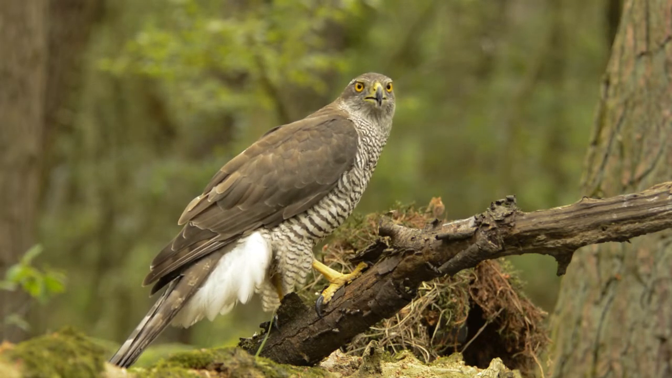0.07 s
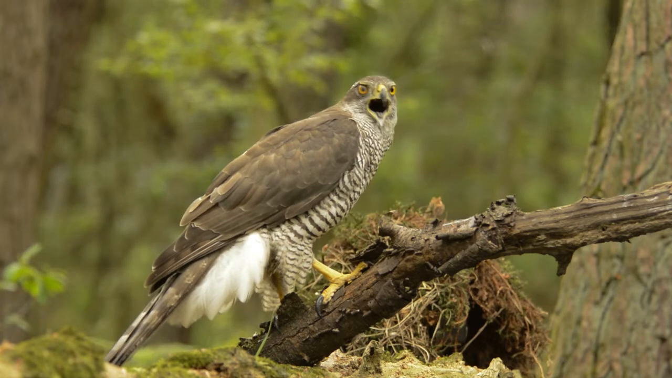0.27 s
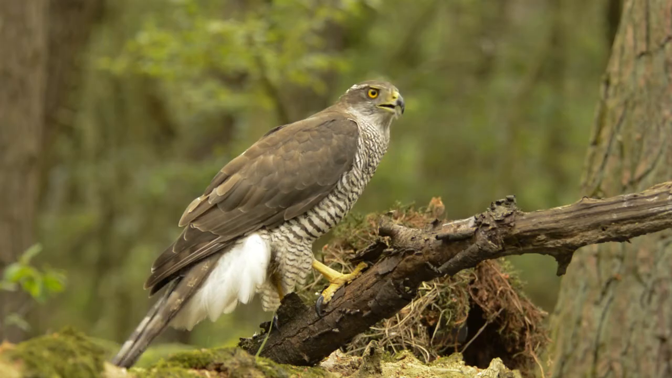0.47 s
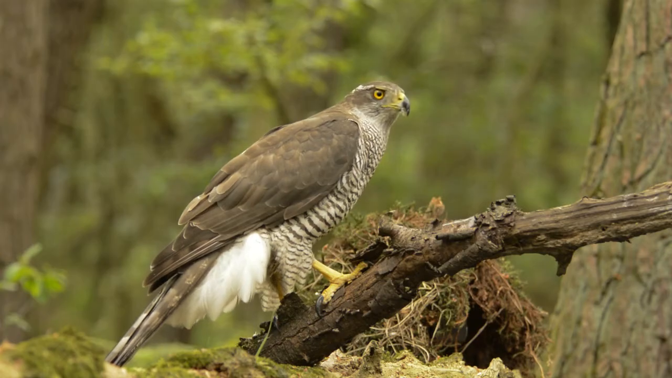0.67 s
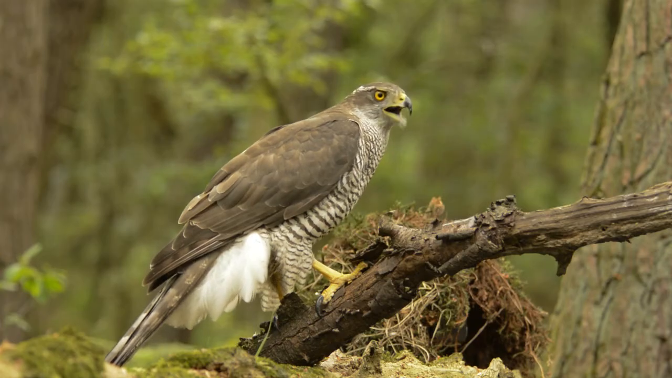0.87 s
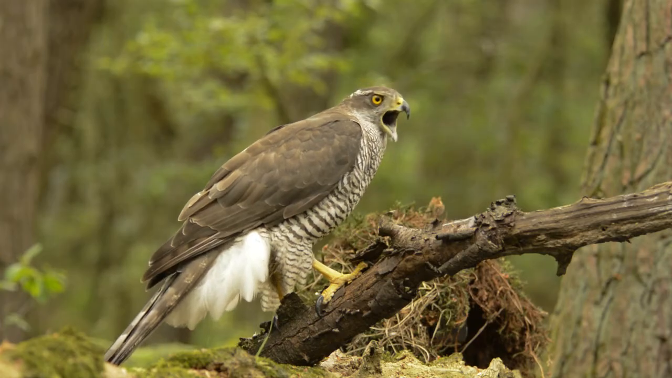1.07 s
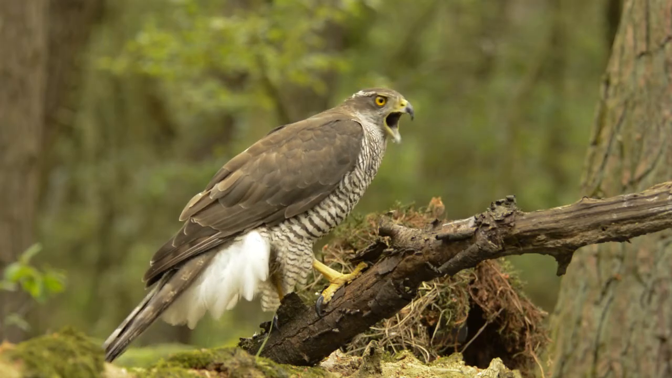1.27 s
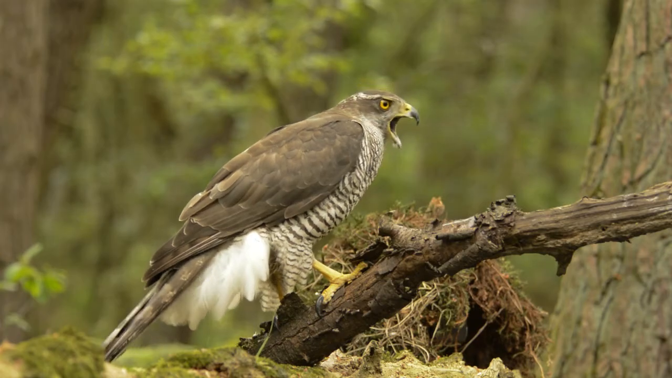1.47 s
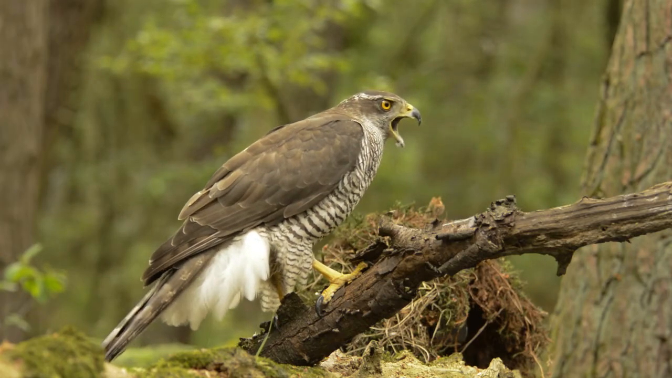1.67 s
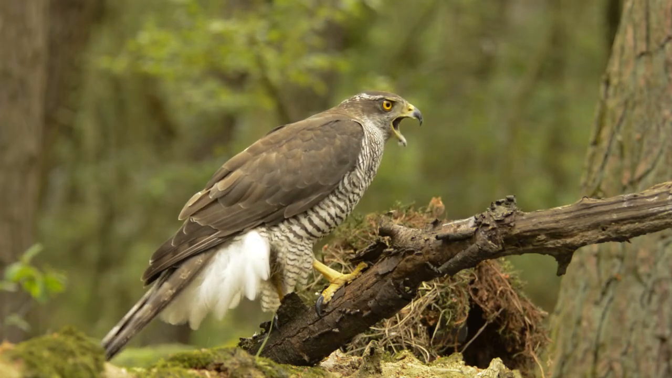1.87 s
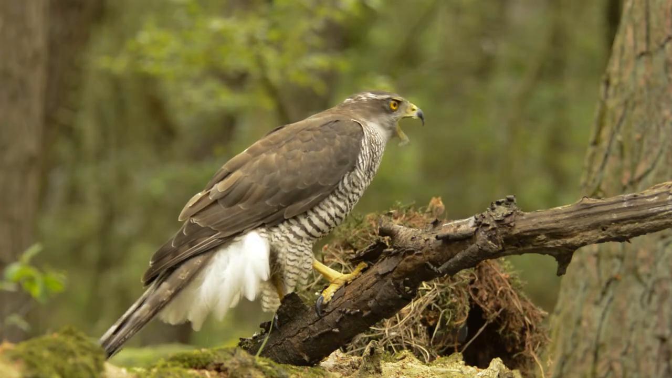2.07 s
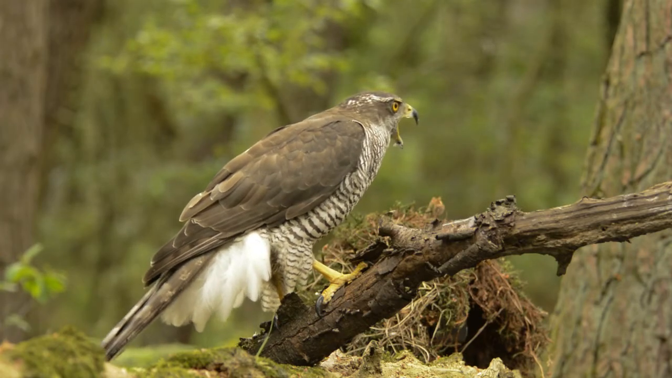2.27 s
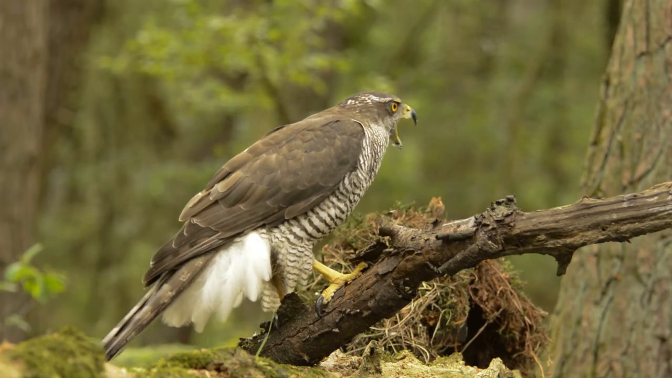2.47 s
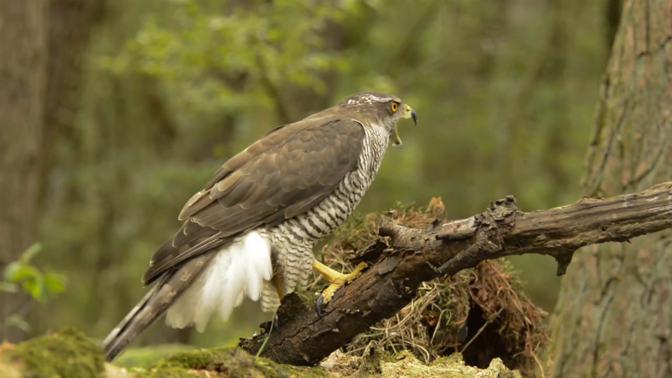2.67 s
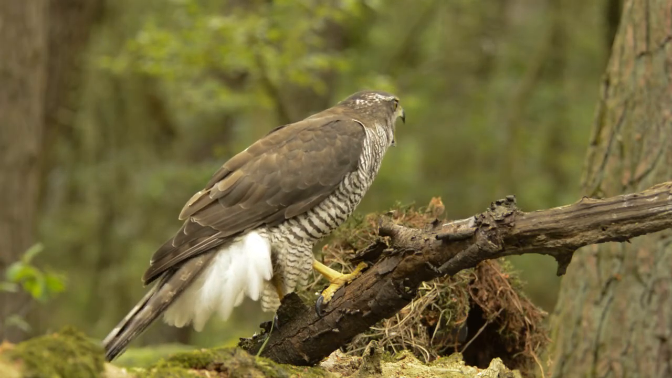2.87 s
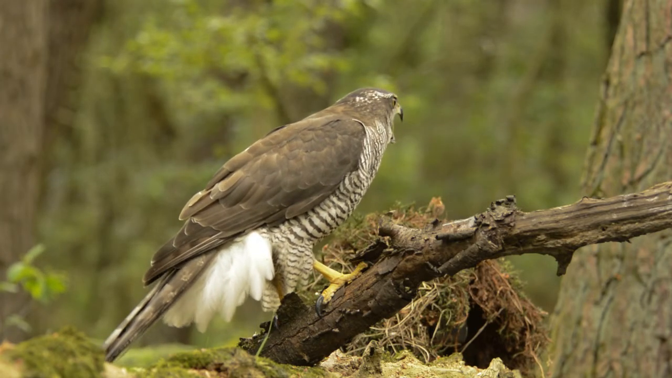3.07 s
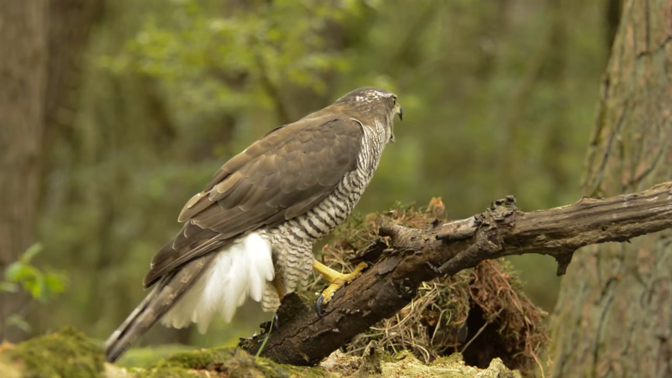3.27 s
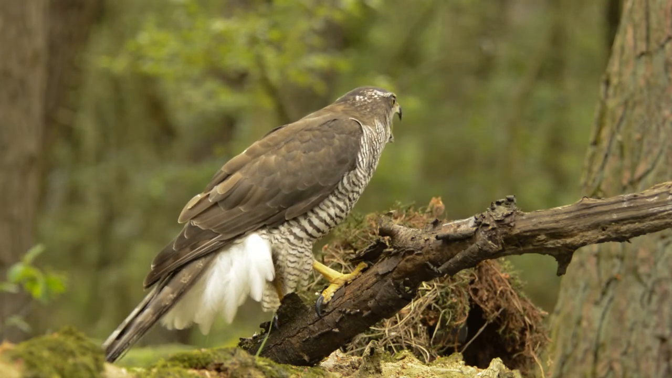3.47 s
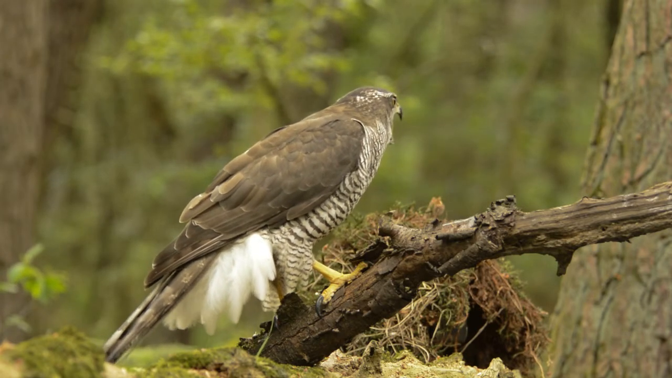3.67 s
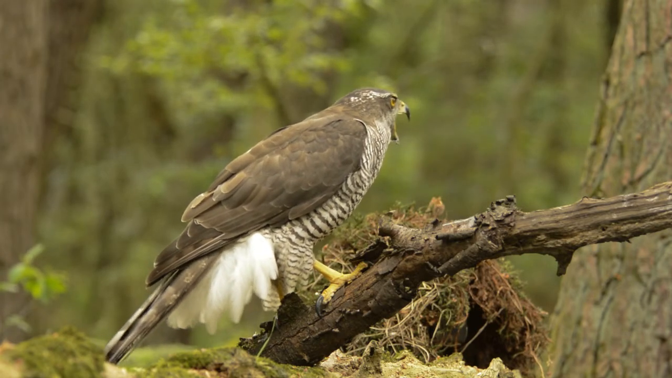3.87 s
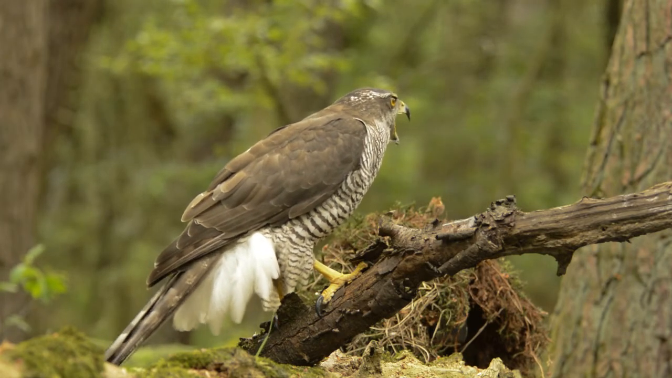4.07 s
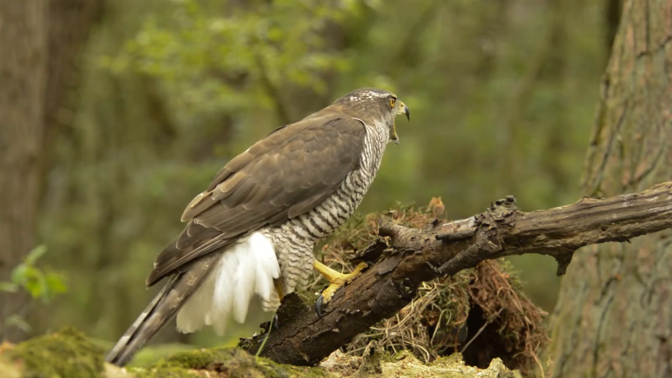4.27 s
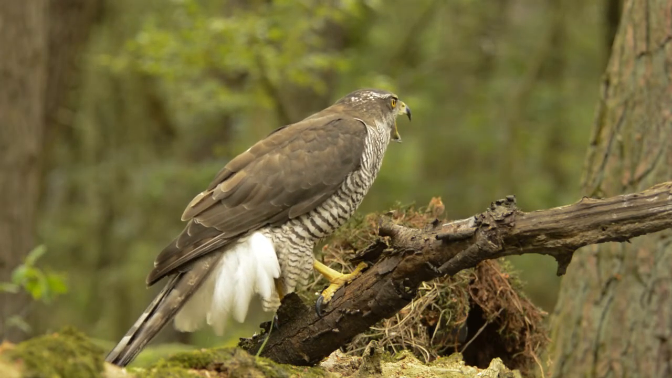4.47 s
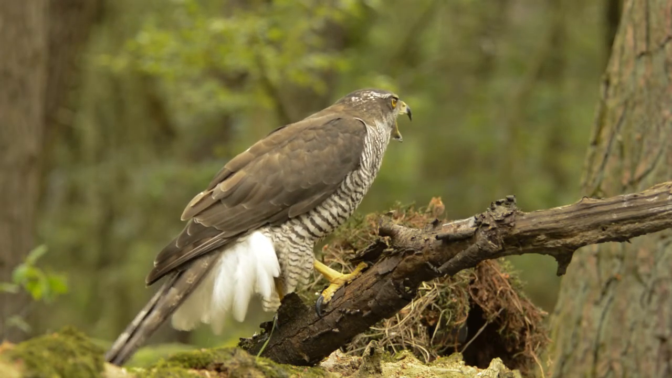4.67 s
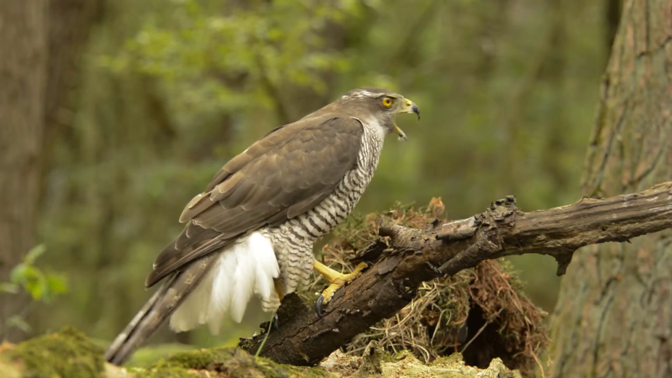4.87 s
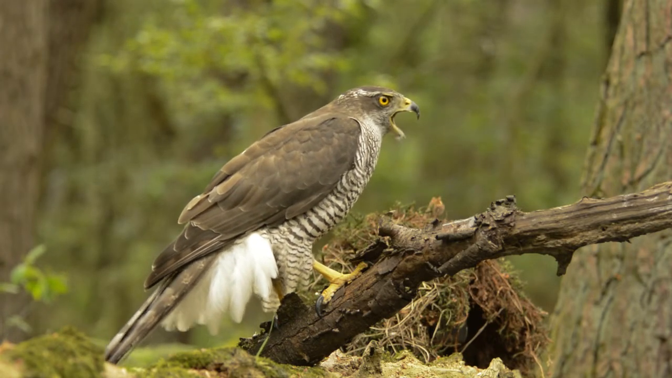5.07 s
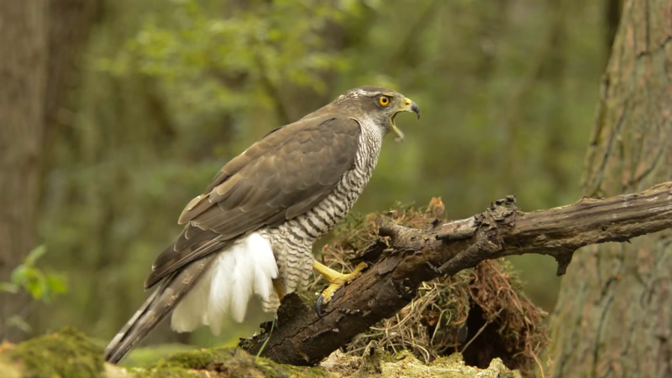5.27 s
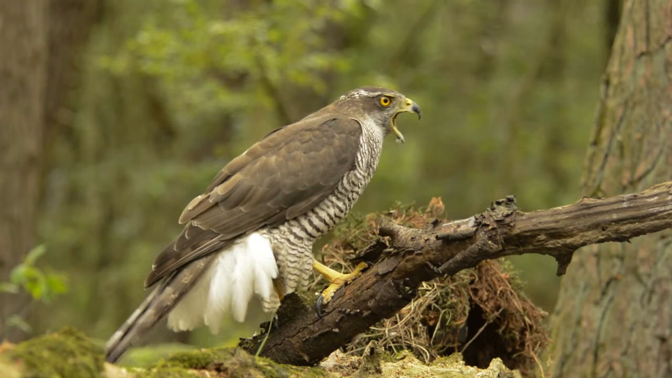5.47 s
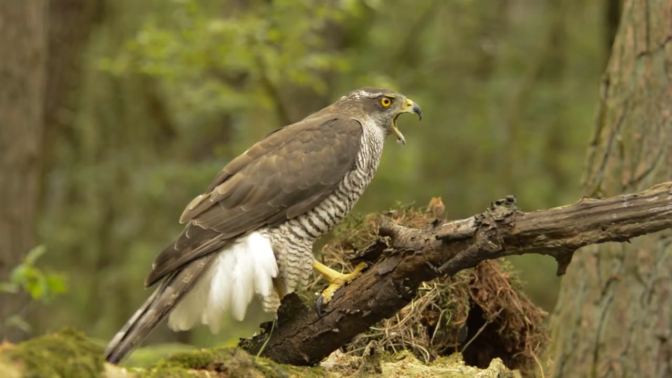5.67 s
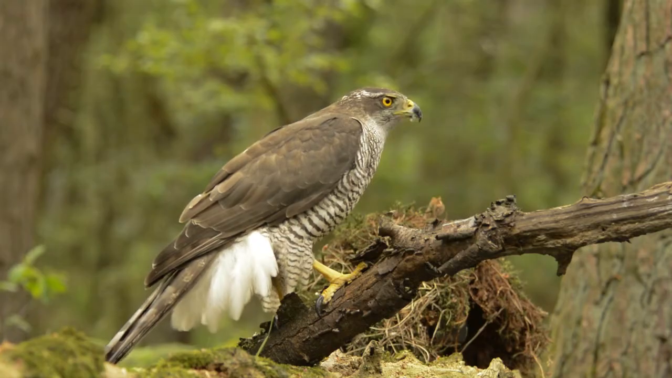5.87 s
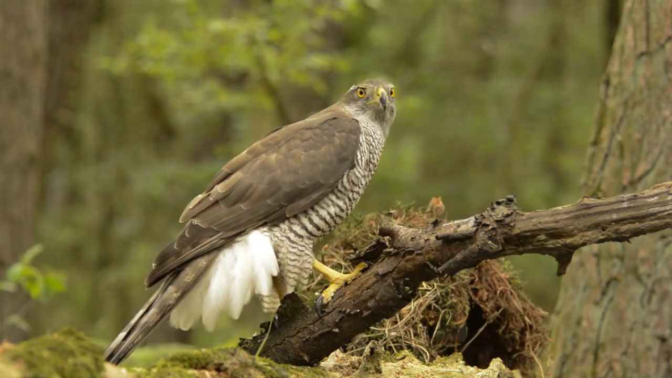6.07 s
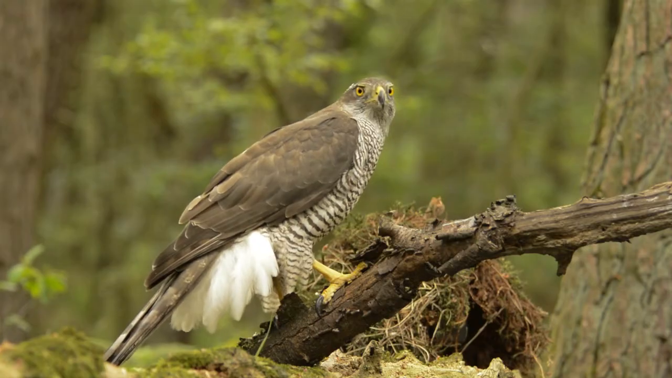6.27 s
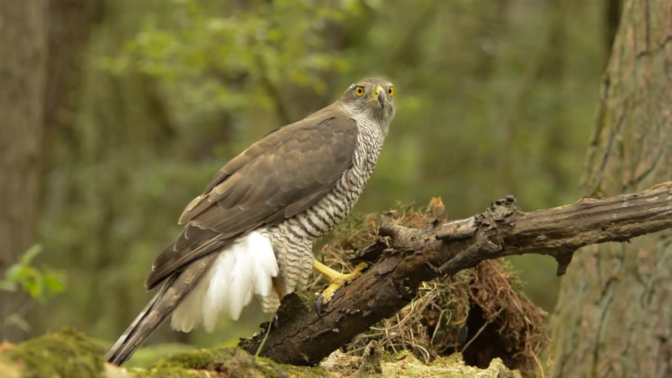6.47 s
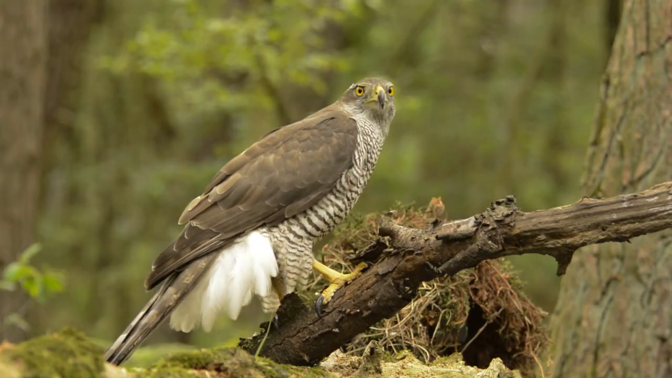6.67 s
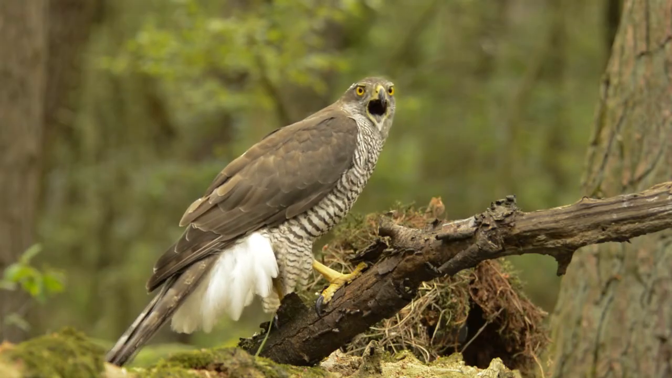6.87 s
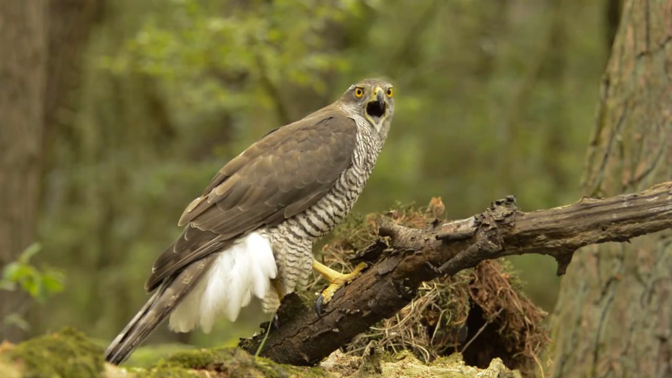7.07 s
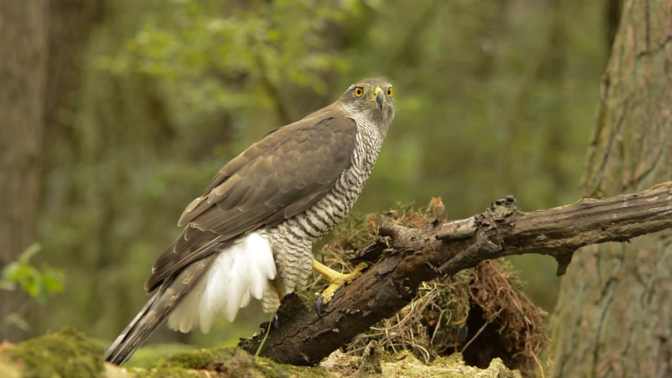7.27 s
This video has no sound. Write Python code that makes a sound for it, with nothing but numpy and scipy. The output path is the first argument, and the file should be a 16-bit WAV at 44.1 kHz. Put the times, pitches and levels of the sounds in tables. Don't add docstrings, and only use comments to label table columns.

```python
import sys
import numpy as np
from scipy import signal
from scipy.fft import rfft, irfft, next_fast_len
from scipy.io import wavfile

SR = 44100
rng = np.random.default_rng(int(sys.argv[2]) if len(sys.argv) > 2 else 0)


def rack_gain(trim_db):
    fader = np.asarray(trim_db, float)
    return 10 ** (fader / 20)


def generate_wav(signal):
    frames = np.transpose(np.atleast_2d(signal))
    scaled = np.clip(frames, -1, 1) * 32767
    pcm = np.round(scaled).astype(np.int16)
    wavfile.write(sys.argv[1], SR, pcm)


N = 323253

# frequency in Hz, level in dB per Hz.
AIR_SPECTRUM = [(15, -29), (35, -10.5), (62, -24), (90, -10), (128, -4.5), (200, -19), (290, -9.5),
                (500, -14), (655, -4), (900, -14.5), (1550, -11), (2900, -15), (7600, -18), (15800, -22.5)]
# frequency in Hz, likeness from 0 to 1.
MICROPHONE_LIKENESS = [(60, 0.99), (180, 0.9), (550, 0.6), (1650, 0.15), (4970, 0.11), (15000, 0.01)]
# start in seconds, level in dB.
RISING_CHIRPS = [(-.012, -61.5), (.951, -56.5), (2.165, -56.5), (3.857, -56), (6.328, -57), (6.477, -57)]
# start in seconds, level in dB.
FALLING_CHIRPS = [(.057, -59), (1.024, -56), (1.84, -59), (2.725, -57.5), (6.547, -61.5)]
# start in seconds, level in dB.
CLOSING_CHIRPS = [(1.108, -57.5), (2.3, -54), (4.03, -62)]
# start in seconds, length in seconds, first pitch in Hz,
# last pitch in Hz, level in dB.
TICKS = [
    (1.003, 0.0065, 9830, 6070, -55),
    (1.163, 0.0068, 9330, 7860, -54),
    (3.985, 0.0081, 9200, 6250, -54),
    (4.268, 0.0059, 8360, 6300, -54),
]
# start in seconds, length in seconds, first pitch in Hz,
# last pitch in Hz, level in dB.
THIN_WHISTLES = [
    (1.175, .44, 9040, 7696, -51),
    (6.198, .465, 9120, 7724, -50),
]
# frequency in Hz, gain in dB.
THROAT = [(400, -37), (900, -26), (1600, -14), (2050, -12), (2400, -10), (2670, 1.5), (2950, -3.5),
          (3500, -4), (4300, -11), (5200, -20), (6500, -25.5), (8000, -21.5), (11000, -33.5), (16000, -38)]
# time in seconds, pitch in Hz, level in dB, beak opening in dB.
LEAD_IN = [
    (0.156, 895, -64, -30),
    (0.171, 1022, -19.5, -58),
    (.188, 1110, -44, -40),
]
# time in seconds, pitch in Hz, level in dB, beak opening in dB.
WAIL = [
    (0.189, 1120, -43, -39),
    (0.202, 1363, -37.5, -26),
    (.221, 1446, -24.5, -3),
    (.276, 1566, -25, 5.5),
    (.332, 1604, -35.5, 15.5),
    (.381, 1559, -21.5, 3.5),
    (0.414, 1480, -25.5, -11),
    (.441, 1366, -34.5, -32),
    (0.467, 1130, -35.5, -41),
]
# time in seconds, pitch in Hz, level in dB, beak opening in dB.
SOFT_NOTE = [
    (1.238, 957, -54, -24),
    (1.251, 1082, -24, -52),
    (1.264, 986, -21, -15.5),
    (1.281, 954, -24.5, -17.5),
    (1.296, 877, -30, -2.5),
    (1.319, 792, -42.5, -13),
]
# start in seconds, peak in dB, top pitch in Hz, length in seconds,
# beak opening in dB.
SHORT_NOTES = [(1.519, -18.5, 1236, 0.032, -0.5), (1.8, -17.5, 1241, 0.034, 0.5),
               (2.055, -17.5, 1250, 0.033, -0.2), (2.299, -20.5, 1280, 0.035, 1.5),
               (2.534, -20.5, 1277, 0.034, 1.7), (2.769, -20.5, 1280, 0.034, 1.5),
               (2.993, -24.5, 1283, 0.037, 4.5), (3.219, -24, 1269, 0.038, 4),
               (3.453, -24.5, 1288, 0.041, 5), (3.683, -25.5, 1304, .045, 8.5),
               (3.907, -22.5, 1311, .042, 6), (4.135, -23, 1324, 0.046, 7), (4.371, -23, 1337, 0.045, 7.5),
               (4.6, -23.5, 1328, 0.043, 8.5), (4.827, -20.5, 1340, 0.042, 6), (5.047, -19, 1350, 0.045, 7),
               (5.262, -19, 1347, 0.044, 7), (5.48, -18.5, 1356, 0.045, 6.5),
               (5.699, -18.5, 1356, 0.045, 6), (6.899, -18, 1188, .029, -1), (7.151, -15.5, 1265, 0.032, 2)]
# share of its length, multiple of the pitch loss, level in dB,
# unevenness of every third cycle in dB, beak opening in dB.
SHORT_NOTE_COURSE = [
    (-.35, 2.2, -48, -14.5, -23.5),
    (-.08, .9, -19.5, -10, -42),
    (0.042, .1, -16.5, 1.5, -2),
    (.3, 0, -3, -16, -1),
    (0.599, .3, 2, -32, -0.5),
    (0.948, 1.0, -1.5, -27, -8),
    (1.098, 1.7, -4.5, -9, -23),
    (1.3, 2.4, -6.5, -19.5, -53),
]
# time in seconds, share turned from 0 to 1.
HEAD_TURN = [(0, 0.26), (1.1, 0.063), (1.9, .3), (2.6, 0.67), (4.6, 0.89), (5.1, 0.48), (5.9, 0.42),
             (6.9, 0.19), (7.2, 0.14)]
# delay in milliseconds, gain in both ears,
# left-right difference.
NEAR_ECHOES = [(4.875, 0.049, -0.38), (6.419, -0.45, -0.028), (9.16, .32, -0.035), (11.607, 0.24, -0.076),
               (14.05, 0.2, 0.08), (17.73, 0.33, 0.14), (24.3, -0.074, -0.017), (30.84, -0.11, -0.15)]
# centre in Hz, width in Hz, level in dB.
WING_HOLLOWS = [
    (287, 43, -15),
    (646, 52, -5.5),
    (1260, 240, 6),
    (1480, 42, -5),
    (1720, 74, -4),
]


def in_time(rows, t):
    s, *columns = np.transpose(rows)
    return [np.interp(t, s, column) for column in columns]


def at_hz(points, hz):
    point_hz, value = np.transpose(points)
    return np.interp(np.log(hz), np.log(point_hz), value)


def rms_one(x):
    return x / np.sqrt(np.mean(x ** 2) + 1e-20)


def band(x, low_hz, high_hz):
    edges_hz = [low_hz, min(high_hz, .45 * SR)]
    return signal.sosfilt(signal.butter(2, edges_hz, "band", fs=SR, output="sos"), x)


def wobble(size, rate):
    knots = rng.standard_normal(int(size * 400 / SR) + 3)
    return np.interp(np.arange(size) * min(rate, 400) / SR, np.arange(len(knots)), knots)


def two_ears(mid, side, alike):
    return np.sqrt(1 + alike) * mid + np.sqrt(1 - alike) * side * [[1], [-1]]


def add(track, start_s, sound):
    i = round(start_s * SR)
    track[i:i + len(sound)] += sound[:N - i]


def convolve(x, response):
    size = next_fast_len(N + response.shape[1])
    return irfft(rfft(x, size) * rfft(response, size), size)[:, :N]


def scatter(t60, start_s, alike, high_hz):
    t = np.arange(int(1.2 * SR)) / SR
    mid, side = rng.standard_normal((2, len(t)))
    side = band(band(side, 2200, 18000), 1800, 19000)
    noise = two_ears(mid, side, np.clip(alike, 0, 1))
    dull = band(noise, 1180, high_hz)
    swell = np.clip(t / start_s, 0, 1) ** 2
    response = swell * (dull * rack_gain(-60 * t / t60) + 0.5 * noise * rack_gain(-130 * t / t60))
    return rms_one(response) / np.sqrt(len(t))


def air():
    out = 0
    edges_hz = 22 * 2 ** np.arange(0, 9.6, .5)
    white = rng.standard_normal((2, 2, N))
    for k, (low_hz, high_hz) in enumerate(zip(edges_hz, edges_hz[1:])):
        centre_hz = np.sqrt(low_hz * high_hz)
        mid, side = band(white[k % 2], low_hz, high_hz)
        alike = np.clip(at_hz(MICROPHONE_LIKENESS, centre_hz), 0, 1)
        gain = rack_gain(at_hz(AIR_SPECTRUM, centre_hz) + .4 * wobble(N, 3))
        out = out + gain * two_ears(mid, side, alike)
    level_db = -58
    return rack_gain(level_db) * rms_one(out) * rack_gain(np.array([[.3], [-.3]]))


def far_rumble():
    level_db, loss_db, throb_db = -62.5, 7, 4.5
    ends_s, fade_s = 1.5, .8
    t = np.arange(N) / SR
    fade = np.clip((t - ends_s) / fade_s, 0, 1)
    rumble_db = level_db - loss_db * fade + throb_db * wobble(N, 3.5)
    deep = band(band(rng.standard_normal(N), 103, 160), 68, 217)
    return rms_one(deep) * rack_gain(rumble_db - 6.5)


def passing_drone():
    loudest_s, span_s = 3.56, 0.97
    level_db, fade_db, approach_db = -58, 10, -64
    rush_low_db = -50
    t = np.arange(N) / SR
    gain = rack_gain(level_db - fade_db * ((t - loudest_s) / span_s) ** 2)
    gain = gain + rack_gain(approach_db) * (t < loudest_s) * (1 - t / loudest_s)
    gain = gain + rack_gain(rush_low_db - 68 * (t[-1] - t))
    mid, side = rng.standard_normal((2, N))
    noise = band(mid + 0.18 * side * [[1], [-1]], 258, 820)
    return rms_one(noise) * gain * rack_gain(-6.5)


def whistle(pitch_hz, level_db, overtone_db):
    phase = 2 * np.pi * np.cumsum(pitch_hz) / SR
    octave = rack_gain(overtone_db) * (pitch_hz < 7950) * np.sin(2 * phase)
    return np.sqrt(2) * rack_gain(level_db) * (np.sin(phase) + octave)


def chirps(rows, hold):
    out = np.zeros(N)
    for s, length, first_hz, last_hz, level_db in rows:
        share = np.arange(0, 1, 1 / SR / length)
        bend = hold if last_hz < first_hz else .7
        glide_hz = first_hz + (last_hz - first_hz) * share ** bend
        swell = np.sqrt(np.sin(np.pi * share))
        add(out, s, swell * whistle(glide_hz, level_db + 5, overtone_db=-39))
    return out


def songbird():
    rise, fall, close = (0.03, 3830, 4340), (0.046, 5060, 3300), (0.019, 4350, 3850)
    low_first_hz, low_last_hz, low_db = 2470, 2220, -9.5
    rows = []
    for table, glide in (RISING_CHIRPS, rise), (FALLING_CHIRPS, fall), (CLOSING_CHIRPS, close):
        rows += [(max(s, 0), *glide, db) for s, db in table]
    rows += [(s, fall[0], low_first_hz, low_last_hz, db + low_db) for s, db in FALLING_CHIRPS]
    return chirps(rows, hold=2.4)


def thin_whistles():
    settle_s, attack_s, release_s = .075, .045, 0.057
    out = np.zeros(N)
    for s, length, first_hz, last_hz, level_db in THIN_WHISTLES:
        t = np.arange(0, length, 1 / SR)
        drop = 0.62 * np.exp(-t / settle_s) + .3 * (1 - t / length)
        glide_hz = last_hz + (first_hz - last_hz) * drop
        shape = np.clip(np.minimum(t / attack_s, (length - t) / release_s), 0, 1)
        add(out, s, shape * whistle(glide_hz, level_db, overtone_db=-18))
    return out


def small_birds():
    middle = rack_gain(-2.5) * scatter(t60=0.33, start_s=0.003, alike=0.63, high_hz=11200)
    middle[:, 0] += rack_gain(np.array([1.5, -6.0]))
    far = scatter(t60=0.74, start_s=0.0043, alike=0.91, high_hz=12600)
    far[:, 0] += .5
    brief = scatter(t60=0.16, start_s=0.0018, alike=0.75, high_hz=12000)
    ticks = chirps(TICKS, hold=1.0)
    return convolve(thin_whistles(), middle) + convolve(songbird(), far) + convolve(ticks, brief)


def syrinx(pitch_hz, level_db, low_db, bright_db, thirds_db, jitter, breath_db, third_db=0, top_db=0):
    size = len(pitch_hz)
    phase = 2 * np.pi * np.cumsum(pitch_hz * (1 + jitter * wobble(size, 299.4))) / SR
    thirds = np.arange(1, 46)[:, None]
    hz = thirds / 3 * pitch_hz
    overtone = thirds > 10
    db = at_hz(THROAT, hz) + np.where(overtone, bright_db, 0) + np.where(hz > 7000, top_db, 0)
    uneven_db = thirds_db + rng.normal(0, 3, thirds.shape) + 5 * wobble(size, 350)
    db = db + np.where(thirds % 3, uneven_db, 0)
    db = db + overtone * (rng.normal(0, 1.5, thirds.shape) - 12 * np.clip(hz / 3000 - 4.3, 0, 1))
    db[2] = low_db
    db[8] += third_db
    lines = np.sin(thirds / 3 * phase + rng.uniform(0, 6, thirds.shape))
    tone = np.sum(rack_gain(db) * (hz < 16000) * lines, axis=0)
    breath = rms_one(band(band(rng.standard_normal(size), 1300, 4300), 2150, 3800))
    breath = breath * (1 + np.cos(phase))
    return rack_gain(level_db) * (np.sqrt(2) * tone + rack_gain(breath_db) * breath)


def long_call(rows, low_db, uneven_db):
    t = np.arange(rows[0][0], rows[-1][0] + .01, 1 / SR)
    pitch_hz, level_db, beak_db = in_time(rows, t)
    level_db = level_db - 9000 * np.clip(t - rows[-1][0], 0, 1)
    third_db = -1 + 0.58 * beak_db
    return syrinx(pitch_hz, level_db, low_db, beak_db, uneven_db, jitter=.0015, breath_db=-50,
                  third_db=third_db, top_db=-13)


def short_note(s, peak_db, top_hz, length, bright_db):
    usual_sag, fresh_sag, settle_s = .12, .035, .45
    sag = usual_sag + fresh_sag * np.exp(-((s - SHORT_NOTES[0][0]) / settle_s) ** 2)
    low_db = -36 - peak_db
    third_db = -18 - (1 - 0.36) * peak_db
    if s > 6.5:
        sag, third_db = .095, third_db + 2.5
    uneven_db = -4 + 0.0442 * (top_hz - 1310)
    facing_db, turned_db = -4, -17.5
    top_db = facing_db + (turned_db - facing_db) * in_time(HEAD_TURN, s)[0]

    share = np.arange(SHORT_NOTE_COURSE[0][0], SHORT_NOTE_COURSE[-1][0], 1 / SR / length)
    fall, level_db, thirds_db, beak_db = in_time(SHORT_NOTE_COURSE, share)
    beak_db = beak_db - 900 * max(sag - usual_sag, 0) * np.clip(share - .35, 0, 1)
    level_db = level_db + 2.5 * np.clip(share, 0, 1) * wobble(len(share), 260)
    lead_db = 8 * np.clip(np.minimum(1 - 2.32 * share, 1 + 1.7 * share), 0, 1)
    break_db = -9 * np.clip(20 * (share - .97), 0, 1)
    note = syrinx(top_hz * (1 - sag * fall), peak_db + level_db, low_db + break_db + lead_db,
                  bright_db + beak_db, thirds_db + uneven_db, jitter=.003, breath_db=-36,
                  third_db=third_db + 0.32 * beak_db, top_db=top_db)
    push = rms_one(band(rng.standard_normal(len(share)), 382, 550))
    note += rack_gain(-57.0 + 0.86 * uneven_db) * push * np.exp(-((share - .05) / 0.38) ** 2)
    return s + share[0] * length, note


def hawk():
    out = np.zeros(N)
    add(out, LEAD_IN[0][0], long_call(LEAD_IN, low_db=-21, uneven_db=-32))
    add(out, WAIL[0][0], long_call(WAIL, low_db=-9.5, uneven_db=-60))
    add(out, SOFT_NOTE[0][0], long_call(SOFT_NOTE, low_db=-21, uneven_db=-32))
    for row in SHORT_NOTES:
        start_s, note = short_note(*row)
        add(out, start_s, note)
    return out


def near_space():
    early = rack_gain(-10) * scatter(t60=.17, start_s=.01, alike=.88, high_hz=9000)
    both, apart = np.zeros((2, early.shape[1]))
    for ms, gain, difference in NEAR_ECHOES:
        i = round(ms * SR / 1000)
        both[i], apart[i] = gain, difference
    early += both + band(apart, 3000, 18000) * [[1], [-1]]
    near = band(early, 1480, 27000) + 0.048 * early.mean(axis=0)
    near[:, 0] += rack_gain(np.array([.3, -.3]))
    return near


def ringing_wood():
    wood = rack_gain(-22.0) * scatter(t60=0.67, start_s=0.09, alike=0.96, high_hz=7600)
    return wood + rack_gain(-29) * scatter(t60=1.5, start_s=.12, alike=.7, high_hz=5000)


def hawk_in_clearing():
    facing_db, turned_db = -11, 2.5
    voice = hawk()
    turned, = in_time(HEAD_TURN, np.arange(N) / SR)
    to_wood = voice * rack_gain(facing_db + (turned_db - facing_db) * turned)
    return convolve(voice, near_space()) + convolve(to_wood, ringing_wood())


def wing_rush():
    start_s, level_db, rise_db, rise_s = 7.17, -52, 24, 0.038
    t = np.arange(N) / SR
    feathers = rng.standard_normal(N)
    hollow = np.zeros(N)
    for hz, width_hz, db in WING_HOLLOWS:
        hollow += rack_gain(db) * rms_one(band(feathers, hz - width_hz / 2, hz + width_hz / 2))
    rising_db = -rise_db * np.exp(-np.clip(t - start_s, 0, 1) / rise_s)
    return hollow * rack_gain(level_db + rising_db + 1.2 * wobble(N, 90)) * (t > start_s)


def scene():
    distance = air() + far_rumble() + passing_drone() + small_birds()
    return distance + hawk_in_clearing() + wing_rush()


def band_limit(x):
    return signal.sosfilt(signal.butter(12, 15970, fs=SR, output="sos"), x)


def record(dry):
    return band_limit(dry)


dry = scene()
out = record(dry)
generate_wav(out)
```